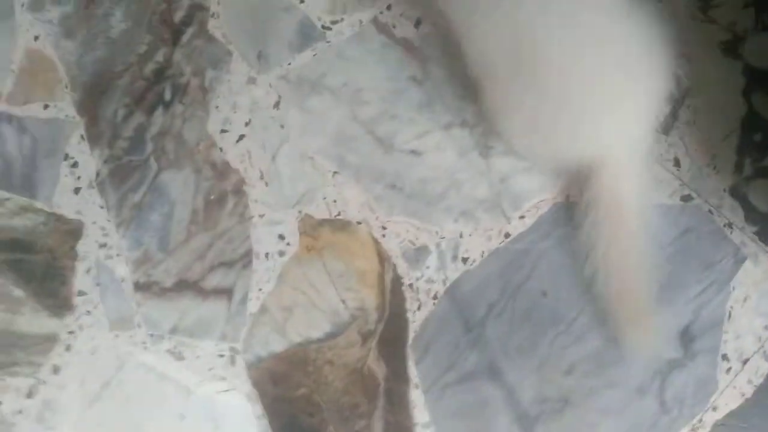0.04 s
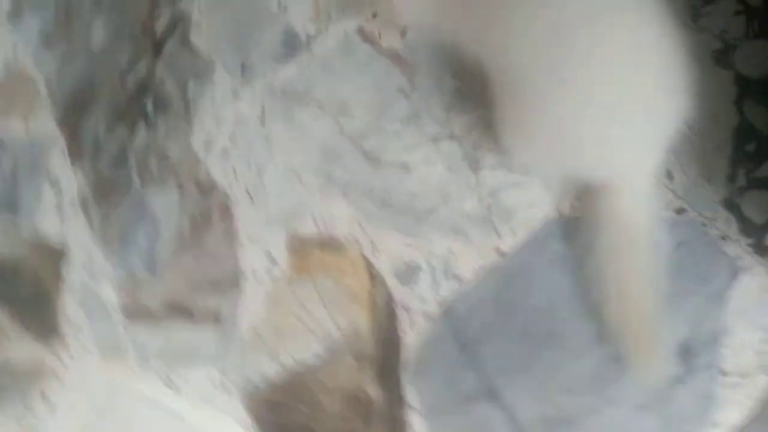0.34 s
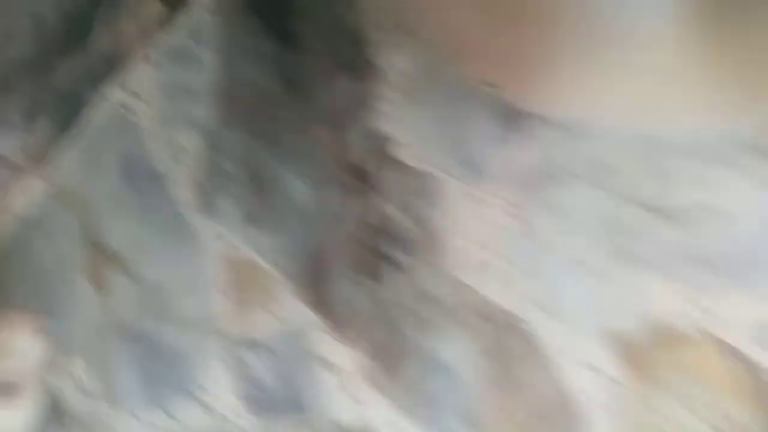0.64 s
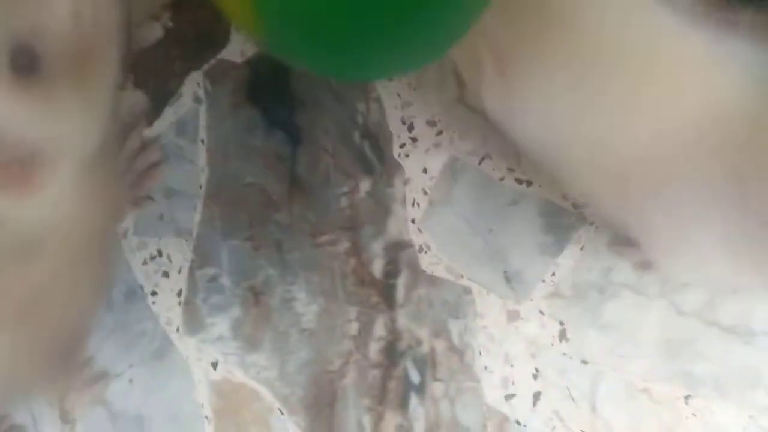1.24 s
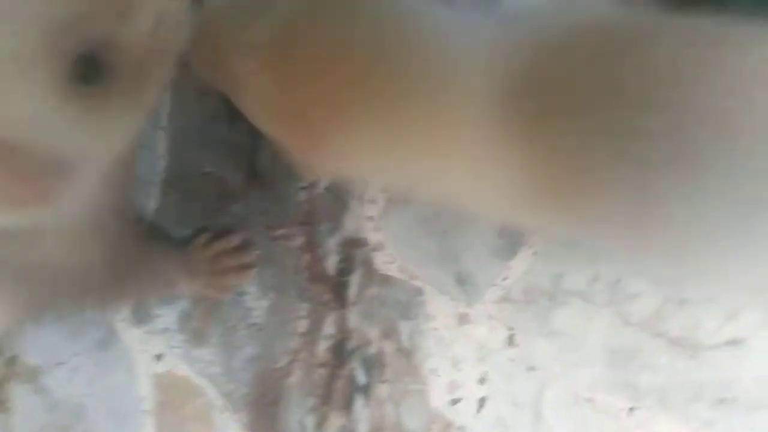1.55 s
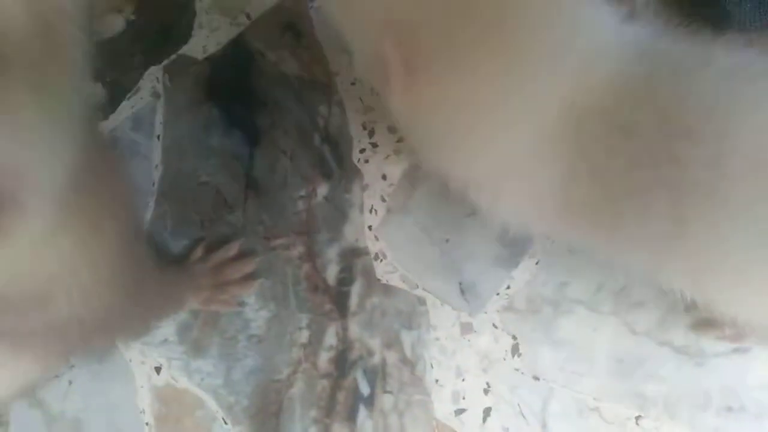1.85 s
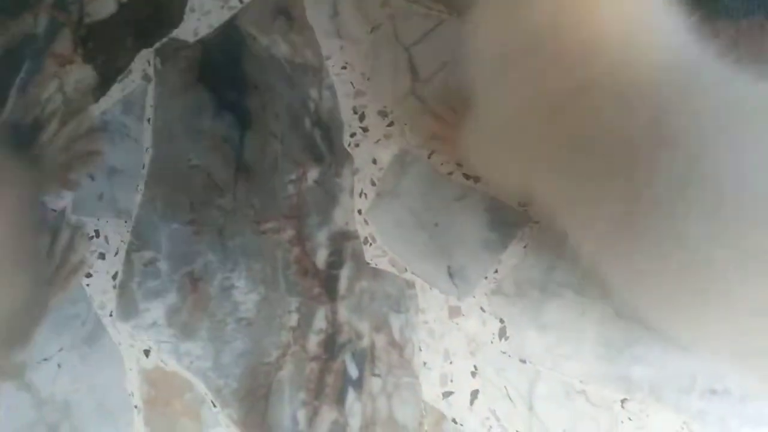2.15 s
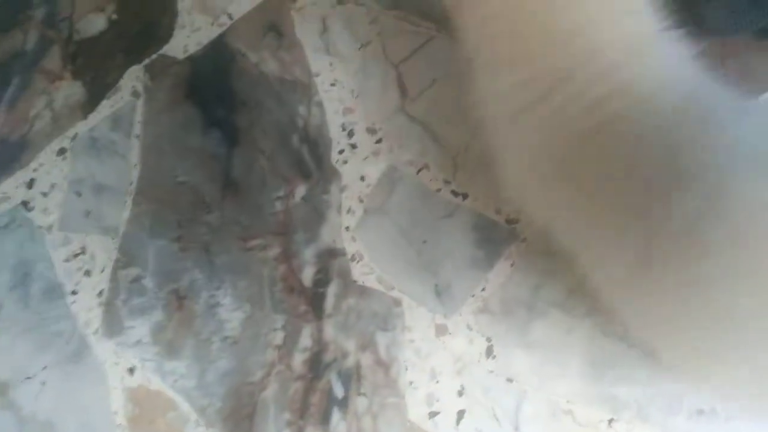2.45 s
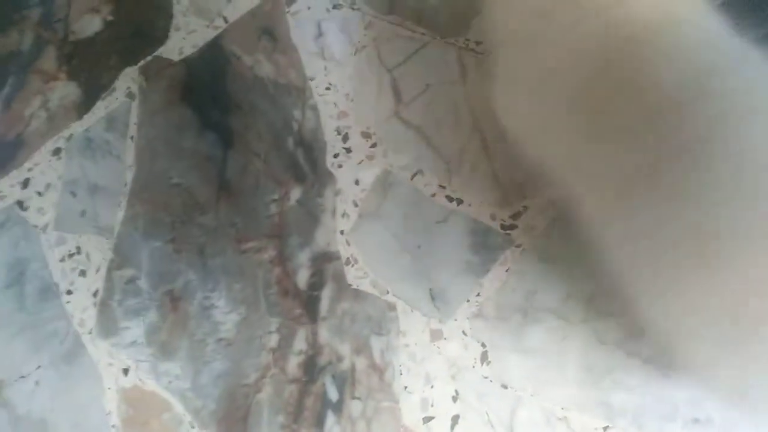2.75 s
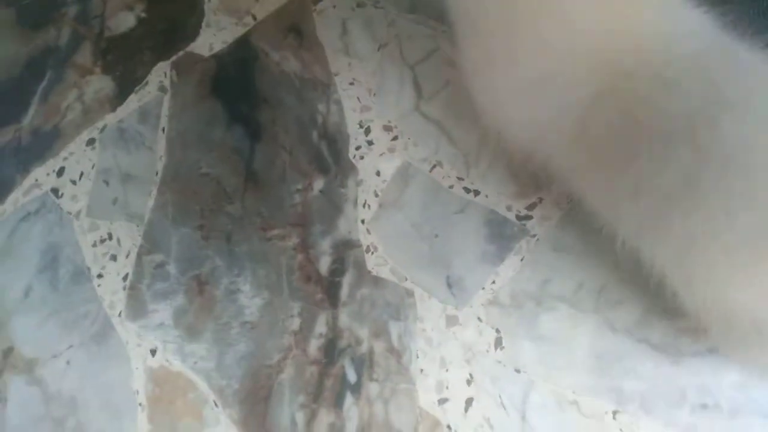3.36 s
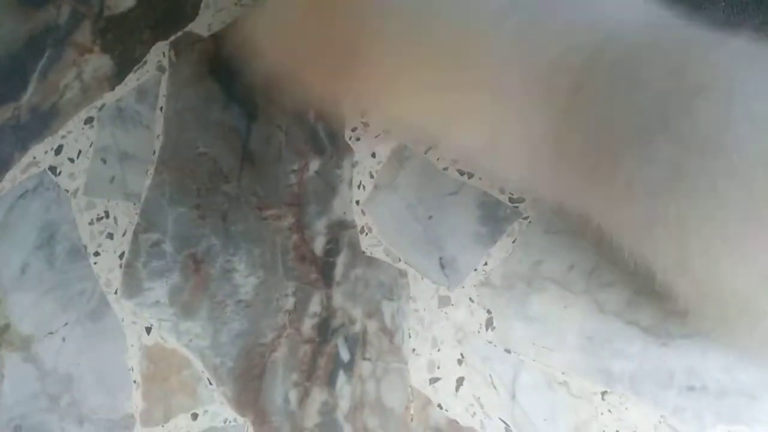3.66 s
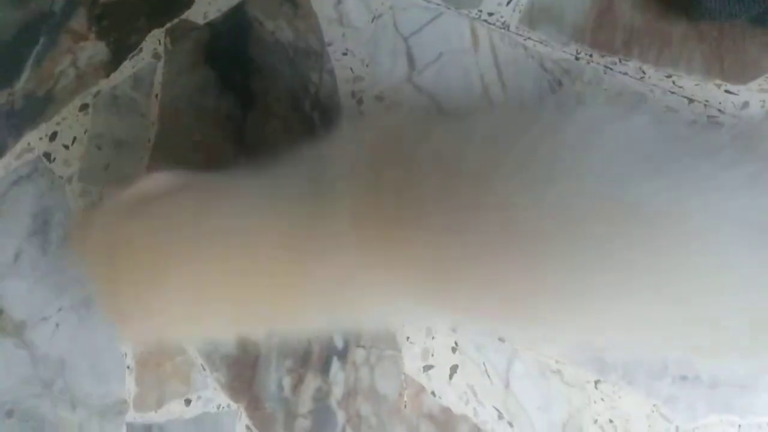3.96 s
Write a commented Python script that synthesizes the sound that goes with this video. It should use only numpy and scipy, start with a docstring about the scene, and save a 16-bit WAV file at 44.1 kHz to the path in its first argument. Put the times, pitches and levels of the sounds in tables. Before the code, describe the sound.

A ferret chatters close to the microphone from the start, alternating short, bright, raspy barks with cleaner, higher squeaks, about ten calls a second. The calls turn softer and a little sparser from about 1.3 to 2 seconds, then grow louder again. At 3.5 seconds the last squeak stretches into a falling whine that fades by about 3.9 seconds. The small room adds slight reverberation and faint steady noise.

```python
"""A chattering ferret

A ferret calls close to the microphone, just above the stone floor of a small room. Its vocal folds
pulse, and throat and mouth filter the harmonics. Bright barks that break up at the end alternate with
cleaner, higher squeaks, about ten calls a second; the last squeak trails off into a falling whine.
Floor and walls reflect the calls over a faint room noise."""
import sys
import numpy as np
from scipy import signal
from scipy.fft import rfft, irfft, next_fast_len
from scipy.io import wavfile
from scipy.ndimage import uniform_filter1d, map_coordinates

SR = 44100
rng = np.random.default_rng(int(sys.argv[2]) if len(sys.argv) > 2 else 0)


def to_wav(s):
    """Save 16-bit WAV."""
    ch = np.atleast_2d(s).T  # columns
    pcm = np.round(np.clip(ch, -1, 1) * 32767)  # PCM
    wavfile.write(sys.argv[1], SR, pcm.astype(np.int16))


N = 176400

# The calls. Each row: start in seconds, length in seconds, crest pitch in Hz, opening rise in Hz,
# closing fall in Hz, relative level in dB, throat boost in dB, mouth resonance gain in dB,
# mouth resonance frequency in Hz, left over right in dB.
BARK_CALLS = [(0.002, 0.055, 940.6, 15, 98, -17.5, 0, -3.5, 4250, -1.5),
              (0.172, 0.049, 893, 103, 48, -19.0, -3.5, -5, 4070, -5.5),
              (0.504, 0.09, 986, 54.0, 163, -18.0, 1, 9.5, 5880, -1.5),
              (0.747, 0.063, 911, 71, 54, -18, 3.2, 0, 4840, 2.7),
              (0.965, 0.033, 910.5, -22, 57, -20, 5.6, 9, 6630, -1.5),
              (1.122, 0.045, 909, 108, 55, -18, -0.2, 1, 6940, 3.5),
              (1.551, 0.032, 837, 56, 82, -24, 1.5, -2, 7000.0, 1),
              (1.693, 0.036, 816, 24, 80.0, -28, 2.4, 5, 4130, -7),
              (2.02, 0.06, 943, 45, 83, -19.5, 6.5, 1, 3180, 6),
              (2.251, 0.025, 890, -25, 140, -21, -1, 1.5, 3460, -0.5),
              (2.419, 0.045, 922, -25, 100, -14.5, -5.5, -7, 4570, 0.7),
              (2.615, 0.045, 915, -30, 74, -18, 0, 4.5, 6900, -1.5),
              (2.801, 0.053, 934, -5.5, 83, -14, -3.5, -14.5, 5000, -2.5),
              (3, 0.05, 932.0, -9.5, 102, -16.5, -1, -18.5, 4880, 0.2),
              (3.199, 0.055, 929.5, -6.0, 86, -16.5, -2.5, -8.5, 5860, -1.8),
              (3.404, 0.074, 917, 42, 85, -17, -5.5, 5, 3160, -0.5)]
SQUEAK_CALLS = [(0.105, 0.031, 980, -16, 59, -24, -4.8, -11.6, 6200.0, -8),
                (0.284, 0.07, 1016.0, -67, 132, -23, 2.5, -6.5, 4600.0, -3.8),
                (0.632, 0.078, 1047, 54, 120, -16.5, -4.5, 9.5, 5500.0, -4.5),
                (0.864, 0.05, 1014, 6, 70, -17, -1, -4, 3200.0, 0.7),
                (1.052, 0.035, 1010.0, 91, 42, -19.5, 2.5, 2.5, 4800.0, 3),
                (1.225, 0.043, 1014, 39, 80, -23, 6.5, 5, 4600.0, 2),
                (1.402, 0.081, 1004.0, 25, 96, -27, 14, 7.5, 4600.0, 3.5),
                (1.802, 0.027, 1002, -22, 110.0, -23, 6, 2.5, 7000.0, 0.7),
                (1.873, 0.045, 862, -28, 92, -49.5, 17, 23.5, 5200.0, 5),
                (1.973, 0.019, 963, -39, 60, -34.5, 16.5, -7, 7000.0, 2),
                (2.125, 0.072, 1054, 13, 125, -19.5, 2.2, 4.5, 7000.0, -1.5),
                (2.329, 0.045, 1023, 25, 69, -16.5, -1.9, -4, 4800.0, 0.5),
                (2.523, 0.049, 1010, 16.5, 47, -20, -4, -1, 2800.0, 2.2),
                (2.715, 0.05, 1029, 45, 130, -19, -7.5, 3.5, 6600.0, -2.5),
                (2.902, 0.057, 1071, 38, 176, -14, -7.5, -7, 7000.0, -7),
                (3.097, 0.062, 1043, 38, 140, -18.5, -3, 6, 6300.0, -1),
                (3.308, 0.068, 1051, 64.5, 116, -16.5, -2.5, -3, 5300.0, 0.5)]
# The whine's course. Each row: time in seconds, pitch in Hz, relative level in dB, throat boost in dB.
WHINE_CONTOUR = [(3.52, 960, -26.5, 5), (3.534, 1010, -16, -9), (3.558, 1040, -12.5, -12.5),
                 (3.589, 1022, -15, -6.5), (3.619, 997.4, -22, -3), (3.665, 951.5, -25.5, 2),
                 (3.721, 909, -38.5, 5.5), (3.785, 891, -48, 10.5), (3.81, 841, -53, 10),
                 (3.884, 790, -51, 2.5), (3.934, 703, -76, 7.5)]
# Filters of throat and mouth. Each row: frequency in Hz, gain in dB.
BARK_TRACT = [(350, -46), (650, -9.5), (920, -20.5), (1300, -2), (1830, -13), (2300, -6.5), (2750, -11),
              (3650, -10.5), (4600, -7), (5500, -4.5), (6400, -5.5), (7300, -8), (8250, 3), (9150, -4),
              (10100, -13.5), (11000, -21), (12000, -15), (13800, -29), (15000, -60.5)]
SQUEAK_TRACT = [(350, -84), (700, -10.5), (1020, -10.5), (1400, -11.5), (2040, -8.5), (2500, -15),
                (3060, -7), (4100, -13), (5100, -13), (6100, -20.5), (7150, -10.5), (8250, 1.5), (9200, -2),
                (10200, -8.5), (11200, -16), (12200, -26.5), (13900, -23), (15000, -85)]
# Where the throat boost acts. Each row: frequency in Hz, share of the boost.
BOOST_SHARE = [(900, 0.4), (1900, 0.98), (3200, 0.39), (5000, 0.15)]
# Phase between the two microphone ports. Each row: frequency in Hz, left lag in radians.
PORT_PHASE = [(100, 8.4), (1000, 1.545), (2000, 1.54), (4000, 1.75), (8000, 1.49), (14000, 1.7)]
# Reverberation time. Each row: frequency in Hz, seconds to decay by 60 dB.
REVERB_T60 = [(200, 0.75), (900, 0.37), (2000, 0.38), (5000, 0.36), (8500, 0.37), (14000, 0.38)]
# Spectra of reverberation, room noise, a bark's puff of air and its opening click.
# Each row: frequency in Hz, relative spectral density in dB.
REVERB_SPECTRUM = [(200, -7.5), (900, 0), (2000, -1.5), (4000, -2), (6000, -1.5), (8500, -5), (11000, -8),
                   (14000, -8)]
HUSH_SPECTRUM = [(25, -15), (60, -5.5), (130, 1.5), (250, -1.5), (400, -5), (550, -12.5), (1300, -21),
                 (2300, -40), (8000, -32), (14000, -40.5)]
PUFF_SPECTRUM = [(25, -5), (80, -8), (200, -19.5), (500, -18.5), (1500, -33)]
CLICK_SPECTRUM = [(300, -42), (1200, 4), (5000, -0.5), (14000, -13)]

FFT_SIZE = 32768
LEAD_S = .02  # the folds start to swing ahead of a call


def amp(db):
    """Amplitude grows tenfold with every 20 dB."""
    return 10 ** (np.asarray(db) / 20)


def unit(x):
    """Normalisation to an rms of 1."""
    return x / np.sqrt(np.mean(x ** 2) + 1e-20)


def along(points, hz):
    """Interpolation of (Hz, value) points on a logarithmic frequency axis."""
    f, values = np.transpose(points)
    return np.interp(np.log(hz + 1), np.log(f + 1), values)


def wobble(rate, x):
    """Spline interpolation of random knots, rate of them per unit of x."""
    return map_coordinates(rng.standard_normal(2048), [x * rate], mode="wrap")


def noise(spectrum, size):
    """Spectral shaping turns white noise into coloured noise of rms 1."""
    gain = amp(along(spectrum, np.fft.rfftfreq(size, 1 / SR)))
    return unit(irfft(rfft(rng.standard_normal(size)) * gain, size))


def add(out, start_s, x):
    """Superposition: x adds to out from start_s on."""
    i = round(start_s * SR)
    x, i = x[:, max(-i, 0):], max(i, 0)
    out[:, i:i + x.shape[1]] += x[:, :out.shape[1] - i]


def minimum_phase(gain):
    """Folding the cepstrum onto positive time gives a causal filter with this gain."""
    cepstrum = irfft(np.log(np.maximum(gain, 1e-6)))
    half = len(cepstrum) // 2
    cepstrum[1:half] *= 2
    cepstrum[half + 1:] = 0
    return np.exp(rfft(cepstrum))


def room_noise():
    """Faint noise sounds wide because its side signal outweighs its mid signal."""
    mid, side = amp(-10) * noise(HUSH_SPECTRUM, N), noise(HUSH_SPECTRUM, N)
    return amp(-53.5) * np.array([mid + side, mid - side])


def reverberation(source, tail_db=-9.5, walls_db=-13.5):
    """Near walls return early reflections; the diffuse tail decays at each frequency's own rate."""
    hz, t, diffuse = signal.stft(rng.standard_normal((2, SR // 2)), SR, nperseg=256)
    decay = amp(along(REVERB_SPECTRUM, hz)[:, None] - 60 * t / along(REVERB_T60, hz)[:, None])
    build_up = 1 - np.exp(-t / 0.0027)
    response = signal.istft(diffuse * decay * build_up, SR, nperseg=256)[1]
    response *= amp(tail_db) / np.linalg.norm(response[0])
    for channel in response:
        delays_s = .03 * rng.uniform(0.16, 1, size=10)
        channel[(delays_s * SR).astype(int)] += amp(walls_db) * unit(rng.standard_normal(10)) / np.sqrt(10)
    return signal.fftconvolve(source[None], response, axes=1)


def microphone_ports(f, pan_db, ripple_hz=897.3):
    """Interference with the floor reflection ripples level and phase at each port; the left one lags."""
    def ripple():
        return np.array([wobble(1 / ripple_hz, f) for _ in range(2)]) * f / (f + ripple_hz)

    lag_s = 0.0003521 + .00005 * rng.standard_normal()  # changes as the head moves
    phase = along(PORT_PHASE, f) + 2 * np.pi * f * lag_s
    floor = amp(ripple()) * np.exp(0.96j * ripple())
    balance = amp(np.array([[1], [-1]]) * pan_db / 2)
    return balance * floor * np.exp(-1j * phase * np.array([[1], [0]]))


def voice(pitch, level, rough, boost_db, mouth_db, mouth_hz, pan_db, tract, hiss_db, mellow=0):
    """Source and filter: fold pulses, uneven when rough, and breath pass the tract into the room."""
    t = np.arange(len(pitch)) / SR
    jittered_hz = pitch * (1 + 0.0019 * wobble(178, t) + 0.055 * rough * wobble(503.2, t))
    harmonic = np.arange(1, 19)[:, None]
    hz = harmonic * np.median(pitch)
    colour_db = boost_db * along(BOOST_SHARE, hz) + mouth_db * np.exp(-((hz - mouth_hz) / 460) ** 2)
    strength = np.maximum(level, mellow * np.exp(-(hz / 2200) ** 2 / 2))
    phase = 2 * np.pi * np.cumsum(jittered_hz) / SR
    pulses = (strength * amp(colour_db) * np.cos(harmonic * phase)).sum(0)
    shimmer = amp((1.56 + 1.5 * rough) * wobble(306.7, t))
    breath = rng.standard_normal(FFT_SIZE)[:len(t)] * (amp(hiss_db) + .3 * rough)
    f = np.fft.rfftfreq(FFT_SIZE, 1 / SR)
    radiated = rfft(pulses * shimmer + level * breath, FFT_SIZE) * minimum_phase(amp(along(tract, f)))
    size = len(t) + 1024  # time for the filters to ring out
    direct = irfft(radiated * microphone_ports(f, pan_db))[:, :size]
    heard = reverberation(irfft(radiated)[:size])
    add(heard, 0, direct)
    return heard


def call(row, tract, attack_s, release_s, swell_db_per_hz, fade_db, fade_power, rough, hiss_db, gain_db):
    """Pitch and level move together: a low start is soft, and the closing fall fades and roughens."""
    _, length, crest_hz, rise_hz, fall_hz, db, boost_db, mouth_db, mouth_hz, pan_db = row
    crest, breaks_at = 0.374, 0.49  # fractions of the length
    t = np.arange(int((LEAD_S + length + .05) * SR)) / SR - LEAD_S
    since_start, since_end = np.maximum(t, 0), np.maximum(t - length, 0)
    opening = np.clip(1 - since_start / length / crest, 0, 1) ** 2
    closing = np.clip((t / length - crest) / (1 - crest), 0, 1)
    breaking = np.clip((t / length - breaks_at) / (1 - breaks_at), 0, 1) ** 2
    pitch = crest_hz - rise_hz * opening - fall_hz * closing ** 2.388 - 1500 * since_end
    effort = amp(db + gain_db - swell_db_per_hz * max(rise_hz, 0) * opening)
    gate = (1 - np.exp(-(since_start / attack_s) ** 2)) * np.exp(-since_end / release_s)
    level = effort * amp(-fade_db * closing ** fade_power) * gate
    # the folds swing gently before and after the bright part
    mellow = effort * amp(-9.5) * np.exp(np.minimum(t, 0) / 0.0048 - since_end / 0.027)
    roughness = rough * breaking + .3 * np.exp(-since_start / 0.009)  # the folds take a moment to lock
    return voice(pitch, level, roughness, boost_db, mouth_db, mouth_hz, pan_db, tract, hiss_db, mellow)


def whine():
    """Sustained fold vibration draws out the last squeak, which sinks in pitch and dies away."""
    times, *columns = np.transpose(WHINE_CONTOUR)
    t = np.arange(times[0], times[-1], 1 / SR)
    pitch, db, boost_db = [np.interp(t, times, column) for column in columns]
    cry = voice(pitch, amp(db), rough=0.0042, boost_db=boost_db, mouth_db=1.5, mouth_hz=5150,
                pan_db=-0.5, tract=SQUEAK_TRACT, hiss_db=-34)
    out = np.zeros((2, N))
    add(out, times[0], cry)
    return out


def squeaks():
    """Nearly periodic fold vibration gives the cleaner, higher calls between the barks."""
    out = np.zeros((2, N))
    for row in SQUEAK_CALLS:
        squeak = call(row, SQUEAK_TRACT, attack_s=.003, release_s=0.0026, swell_db_per_hz=0.02,
                      fade_db=8.5, fade_power=3.2, rough=0.17, hiss_db=-34.5, gain_db=1.5)
        add(out, row[0] - LEAD_S, squeak)
    return out


def barks():
    """Aperiodic fold vibration ends each bright bark in a rasp; the expelled air adds a low puff."""
    out = np.zeros((2, N))
    t = np.arange(8192) / SR
    for row in BARK_CALLS:
        start_s, rise_hz, db = row[0], row[3], row[5]
        bark = call(row, BARK_TRACT, attack_s=.002, release_s=0.008, swell_db_per_hz=0.07,
                    fade_db=8, fade_power=3.3, rough=.75, hiss_db=-17, gain_db=3)
        add(out, start_s - LEAD_S, bark)
        puff = noise(PUFF_SPECTRUM, len(t)) * np.exp(-t / 0.059) * (1 - np.exp(-t / .002))
        add(out, start_s, amp(db - 25.5) * puff * np.array([[1], [-.5]]))
        click = np.array([noise(CLICK_SPECTRUM, len(t)) for _ in range(2)]) * np.exp(-t / .0008)
        if rise_hz < 10:  # only a bark that starts at full pitch opens with a click
            add(out, start_s + .0008, amp(db - 11) * click)
    return out


def scene():
    """The ferret's calls and the room noise add linearly."""
    return barks() + squeaks() + whine() + room_noise()


def record(dry):
    """Limiting: gain falls as short-term power nears a ceiling; a low-pass then bounds the band."""
    ceiling_db, window_s, cutoff_hz = -11, 0.0046, 15200
    power = uniform_filter1d((dry ** 2).mean(0), int(window_s * SR))
    limited = dry / (1 + (power / amp(ceiling_db) ** 2) ** 2) ** .25
    size = next_fast_len(N + FFT_SIZE // 2)
    passband = np.fft.rfftfreq(size, 1 / SR) < cutoff_hz
    return irfft(rfft(limited, size) * passband, size)[:, :N]


dry = scene()
out = record(dry)
to_wav(out)
```